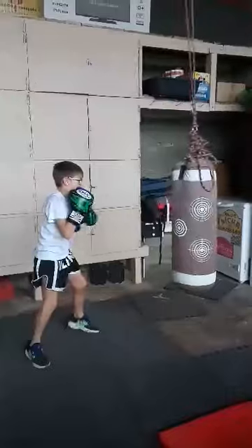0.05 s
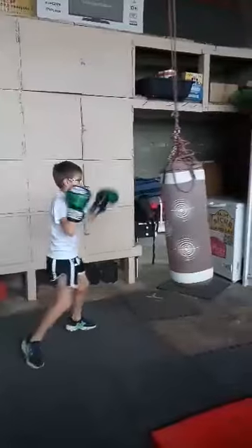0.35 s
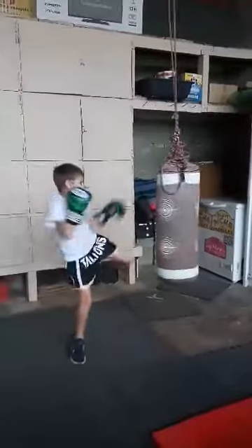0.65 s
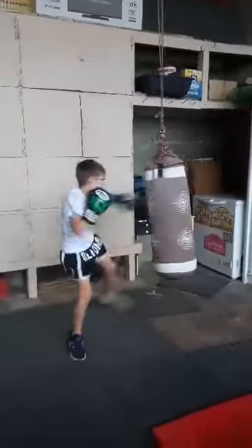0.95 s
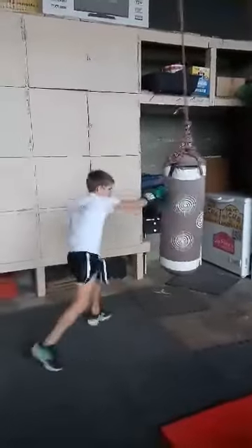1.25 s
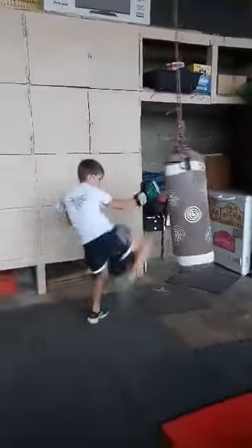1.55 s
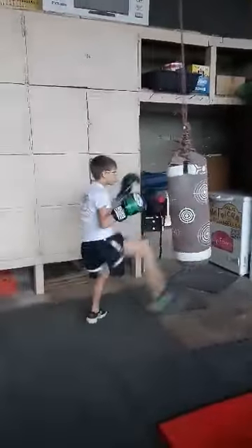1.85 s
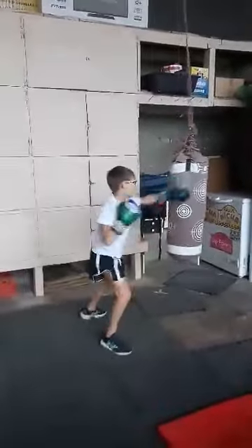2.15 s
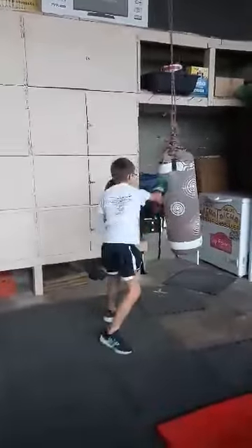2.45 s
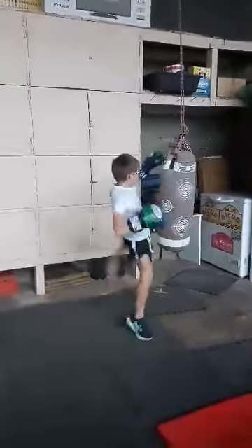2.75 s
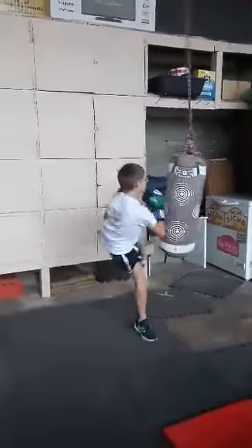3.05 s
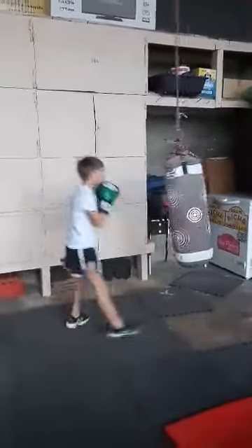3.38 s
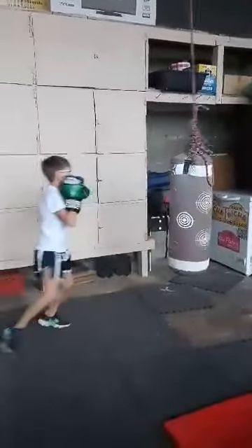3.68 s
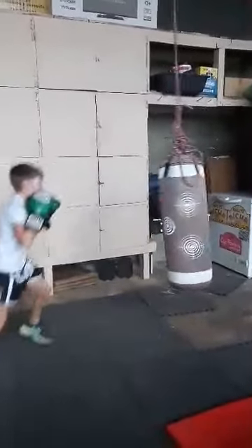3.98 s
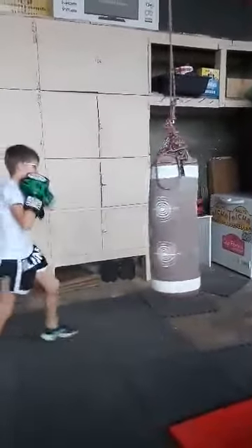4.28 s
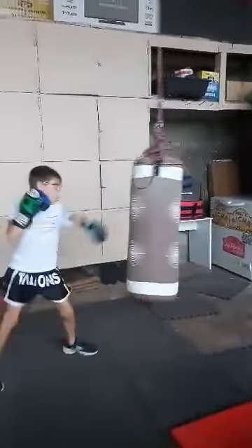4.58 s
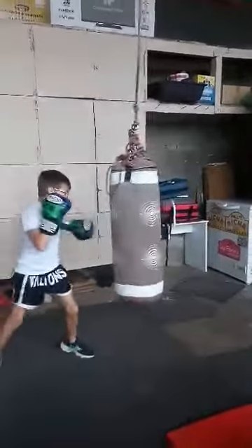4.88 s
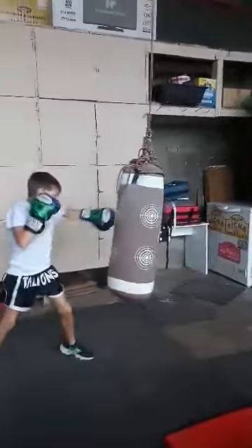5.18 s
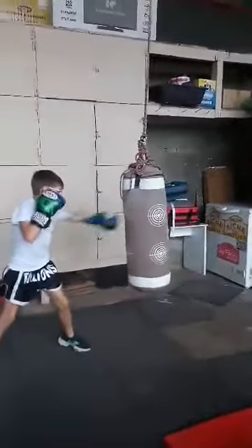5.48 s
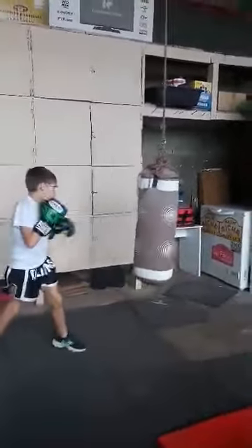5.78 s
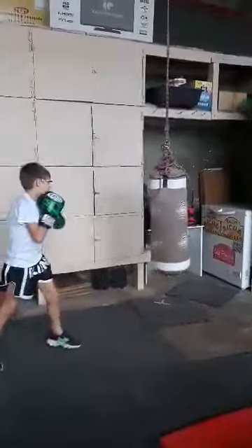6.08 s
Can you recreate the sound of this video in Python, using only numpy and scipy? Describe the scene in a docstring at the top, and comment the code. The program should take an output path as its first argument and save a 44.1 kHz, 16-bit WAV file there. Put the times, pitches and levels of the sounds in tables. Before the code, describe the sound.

In a garage, a quick run of blows hits a heavy bag, followed by footwork on mats, two lighter punches and a soft creak.

```python
"""Gloves and kicks on a hanging heavy bag in a garage; the room answers every sound.
A shuffle and a step lead into six blows (0.8-3 s): each a push of air, a boom of the filling and a
crackling slap of the cover. Clothes and soles swish; the hanger ticks and squeaks.
Footwork on rubber mats (3.3-4.5 s) leads into two lighter blows (4.8, 5.1 s).
The hanger creaks as the bag swings out (5.7-6 s), and a last soft step follows."""
import sys
import numpy as np
from scipy import signal
from scipy.fft import rfft, irfft
from scipy.io import wavfile
from scipy.ndimage import uniform_filter1d

SR = 44100
rng = np.random.default_rng(int(sys.argv[2]) if len(sys.argv) > 2 else 0)


def unload_audio(sound):
    """Save the sound as a 16-bit wav file, at the path given as the first command line argument."""
    columns = np.transpose(np.atleast_2d(sound))
    # keep every value between -1 and 1, then stretch to whole-number steps
    steps = np.round(np.clip(columns, -1, 1) * 32767)
    wavfile.write(sys.argv[1], SR, steps.astype(np.int16))


N = 274743
T = np.arange(int(.7 * SR)) / SR   # time axis of one event, s

# kicks and punches: t/s, force/dB, push f/Hz, boom/dB re force, boom f/Hz, slap/dB re force,
# crumple/dB re force, cover flattening/s, graze lead/s, swing-in/dB, slide-off/dB
BLOWS = [(0.8043, -33.5, 190.5, 12.5, 99, -6.5, -13.5, 0.0021, 0.0094, -84, -69),
         (1.0620, -41.5, 266, -13, 90, -5.5, -13.5, 0.0019, 0, -95, -59.5),
         (1.273, -39, 273, -14.5, 90, -7.5, -15, 0.0028, 0.015, -65, -63.5),
         (1.7074, -30, 165, -6.5, 66, -5, -17.5, 0.0026, 0.0061, -83, -62),
         (2.432, -36, 257, -20, 90, -11, -20, 0.0012, 0, -76, -65),
         (2.9506, -30, 262, 8, 85, -4.5, -13, 0.0034, 0.011, -69.5, -63),
         (4.7522, -41.5, 318, -3.5, 100, -5, -12.5, 0.0018, 0.024, -68, -67),
         (5.1190, -47, 288, -9, 100, -16, -11.5, 0.0075, 0, -90, -83)]
# steps: t/s, heel/dB, knock f/Hz, toe delay/s, toe/dB re heel, sole slap/dB re knock,
# heel grit/dB, toe grit/dB, sole flattening/s
STEPS = [(0.62, -64.5, 154, 0.015, -19, -5.5, -64.5, -72, 0.005),
         (1.984, -50.5, 330, 0.041, -1, -8, -58, -60.5, 0.0099),
         (2.088, -44.5, 307, 0.014, -9, -14.5, -64.5, -80, 0.0047),
         (2.658, -54.5, 205, .023, 6, -9, -67, -61, .002),
         (3.308, -44.5, 322, 0.053, -5.5, -2, -53, -64, 0.0059),
         (3.998, -51, 377, .055, -5, -1.5, -86, -61.5, 0.01),
         (4.387, -64, 442, 0.022, 3, -15, -76.5, -83, 0.0039),
         (4.487, -57.5, 214, 0.025, -2.5, -2, -83, -80, .006),
         (6.180, -68, 174, .015, -5, -12, -76, -72, 0.0041)]
# spectrum of cover crackle and floor grit: f/Hz, level/dB
CRACKLE = [(900, -25), (1800, -2.5), (2900, 3), (4300, -5), (6800, -5), (9500, -12.5), (13000, -22)]


def from_db(db):
    return 10 ** (np.asarray(db) / 20)


def at_hz(points, hz, column=1):
    """Table column interpolated over log frequency."""
    points = np.array(points, float)
    return np.interp(np.log(hz + 1e-3), np.log(points[:, 0]), points[:, column])


def noise(spectrum, samples, uneven_db=0):
    """Coloured noise, rms 1; uneven_db adds chance resonances a few hundred Hz wide."""
    hz = np.fft.rfftfreq(samples, 1 / SR)
    knots_hz = np.arange(0, SR / 2, 270)
    ripple = np.interp(hz, knots_hz, 2 * rng.random(len(knots_hz)) - 1)
    resonances_db = uneven_db * ripple * np.minimum(hz / 1500, 1)
    low_cut = np.minimum(hz / spectrum[0][0], 1) ** 2
    gain = from_db(at_hz(spectrum, hz) + resonances_db) * low_cut
    x = irfft(rfft(rng.standard_normal(samples)) * gain, samples)
    return x / np.std(x)


def gritty(spectrum, grain_db, uneven_db, grain_samples):
    """Noise in uneven grains, rms 1."""
    grain = uniform_filter1d(rng.standard_normal(len(T)), size=grain_samples)
    flicker = from_db(grain_db * np.clip(grain / np.std(grain), -2, 2))
    x = noise(spectrum, len(T), uneven_db) * flicker
    return x / np.std(x)


def burst(x, db):
    """Transient scaled to the energy of 25 ms at this level."""
    return from_db(db) * x / np.sqrt(np.sum(x ** 2) / (.025 * SR) + 1e-20)


def add(out, t_s, x):
    start = round(t_s * SR)
    lo, hi = max(start, 0), min(start + x.shape[-1], N)
    out[..., lo:hi] += x[..., lo - start:hi - start]


def left_right(mid, side, side_db=-1.5):
    return np.array([mid + from_db(side_db) * side, mid - from_db(side_db) * side])


def air():
    """Steady, low room noise."""
    spectrum = [(15, -48), (25, -10), (141, 2), (285, -5), (370, -3.5), (433, -6), (534, -8), (812, -11),
                (1170, -14.5), (1980, -16.5), (2250, -18), (3160, -20.5), (4220, -21), (13000, -38.5)]   # f/Hz, level/dB
    return from_db(-69) * left_right(noise(spectrum, N), noise(spectrum, N))


def garage(x):
    """Direct sound, floor and cupboard reflections, then a tail that differs with every position."""
    # early reflections: delay/s, gain
    echoes = [(.0050, 0.28), (0.011, 0.41), (0.031, .22)]
    # diffuse tail: f/Hz, t60/s, level/dB re direct
    decay = [(60, 0.67, -1), (129, 0.28, 5), (355, 0.41, 4.5), (910, 0.35, 0), (2160, 0.52, 3.5),
             (5530, 0.36, 0), (12000, 0.17, -4)]
    build_s = 0.0068
    onset = 1 - np.exp(-(T / build_s) ** 2)
    hz = np.fft.rfftfreq(len(T), 1 / SR)
    octaves_hz = 50 * 2. ** np.arange(9)
    white = rfft(rng.standard_normal((2, len(T))))
    tail = 0
    for centre_hz, share in zip(octaves_hz, np.eye(len(octaves_hz))):
        band = irfft(white * np.interp(np.log(hz + 1), np.log(octaves_hz), share), len(T))
        fade = from_db(-60 * T / at_hz(decay, centre_hz)) * onset
        tail = tail + band * fade / np.linalg.norm(fade) * from_db(at_hz(decay, centre_hz, column=2))
    response = left_right(*tail)
    response[:, 0] += 1
    for delay_s, gain in echoes:
        response[:, round(delay_s * rng.uniform(.92, 1.08) * SR)] += gain
    return signal.fftconvolve(x[None], response, axes=1)[:, :len(x)]


def stroke(half_s):
    """A slide speeds up and slows down around the middle of T."""
    return np.exp(-((T - T.mean()) / half_s) ** 2 / 2)


def squeak(hz, width_hz):
    """Friction noise in one narrow resonance, rms 1."""
    link = signal.iirpeak(hz, hz / (2 * width_hz), fs=SR)
    x = signal.lfilter(*link, signal.lfilter(*link, rng.standard_normal(len(T))))
    return x / np.std(x)


def hanger():
    """Slipping links excite one resonance each, purer the longer they slip; a creak excites several."""
    # link slips, ticks to squeaks: middle t/s, half length/s, f/Hz, level/dB
    slips = [(0.795, .0092, 9400, -69.5), (1.063, 0.0011, 9550, -51.5), (1.066, 0.0038, 2830, -51),
             (1.112, 0.012, 1090, -50), (1.281, 0.0073, 9700, -62), (1.692, 0.02, 9100, -70),
             (2.182, .022, 8740, -66.5), (2.24, 0.012, 5460, -66), (2.46, 0.0066, 8960, -68),
             (3.057, 0.00064, 6600, -44.5), (4.393, 0.0035, 6600, -73), (5.532, 0.0016, 5400, -68)]
    # creaks as the bag swings out: middle t/s, half length/s, level/dB
    creaks = [(5.692, .022, -68.5), (5.785, 0.024, -71), (5.972, .03, -82)]
    # hanger resonances: f/Hz, width/Hz, level/dB
    creak_modes = [(1066, 75, 1.5), (2650, 160, -7), (4720, 140, -10), (6280, 290, -6)]
    ref_width_hz, ref_half_s = 290, 0.0084
    out = np.zeros(N)
    for t_s, half_s, hz, db in slips:
        width_hz = ref_width_hz * np.sqrt(ref_half_s / half_s)
        add(out, t_s - T.mean(), from_db(db) * squeak(hz, width_hz) * stroke(half_s))
    for t_s, half_s, creak_db in creaks:
        creak = sum(from_db(db) * squeak(hz, width_hz) for hz, width_hz, db in creak_modes)
        add(out, t_s - T.mean(), from_db(creak_db) * creak * stroke(half_s))
    return garage(out)


def swishes():
    """Sliding friction catches in small grains: a broad rub under the sheen of smooth fabric."""
    # shuffles and turns: middle t/s, half length/s, rub/dB, sheen/dB re rub
    shuffles = [(0.489, 0.18, -79, -19), (1.473, .039, -77, -8), (2.275, 0.075, -63, -2),
                (2.362, 0.04, -61.5, -15), (2.56, 0.037, -70, -4), (3.256, 0.043, -63.5, -21),
                (3.52, .017, -70.5, -12), (3.645, 0.028, -66.5, -2), (5.58, 0.05, -76.5, -7.5),
                (5.731, .065, -72.5, -3)]
    # friction spectra: f/Hz, level/dB
    rub_spectrum = [(300, -4), (900, -4.5), (1600, 1.5), (2900, 7.5), (4300, 1.5), (6500, 3), (8500, -19),
                    (13000, -37)]
    sheen_spectrum = [(3000, -46), (6500, 2.5), (8200, -1), (9400, 2.5), (11000, -2.5), (13000, -13)]
    slides = []   # columns as in shuffles
    for t_s, *_, swing_db, slide_db in BLOWS:
        slides.append((t_s - 0.047, 0.024, swing_db, -9))   # clothes, as the limb swings in
        slides.append((t_s + .062, 0.037, slide_db, -2.5))   # glove or shin slides off
    for t_s, _, _, toe_s, *_, toe_grit_db, _ in STEPS:
        slides.append((t_s + toe_s + .015, .015, toe_grit_db - 3.5, -9.5))   # sole scuffs as the toe lands
    out = np.zeros(N)
    for t_s, half_s, rub_db, sheen_db in slides + list(shuffles):
        rub = gritty(rub_spectrum, grain_db=2.5, uneven_db=7, grain_samples=100)
        sheen = gritty(sheen_spectrum, grain_db=3.5, uneven_db=8, grain_samples=150)
        add(out, t_s - T.mean(), from_db(rub_db) * (rub + from_db(sheen_db) * sheen) * stroke(half_s))
    return garage(out)


def push(hz, decay_cycles):
    """Padded contact: the surface dents, rebounds and is still within a cycle or two."""
    cycles = hz * T
    return -np.sin(2 * np.pi * cycles) * np.sqrt(cycles) * np.exp(-cycles / decay_cycles)


def slap(spectrum, flatten_s, grain_db):
    """Two surfaces meet patch by patch: a quick, uneven spray of small cracks."""
    contact = (1 - np.exp(-T / (flatten_s / 2))) ** 2 * np.exp(-T / (2 * flatten_s))
    return gritty(spectrum, grain_db, uneven_db=7, grain_samples=40) * contact


def footwork():
    """Heel and toe each knock on the mat; the sole claps down over grit."""
    sole_spectrum = [(250, -10.5), (450, 9), (700, -5.5), (1100, 5.5), (1750, -4), (2500, -12.5),
                     (5000, -41), (12000, -62)]   # f/Hz, level/dB
    out, soles = np.zeros((2, N)), np.zeros(N)
    for t_s, heel_db, knock_hz, toe_s, toe_db, sole_db, heel_grit_db, toe_grit_db, flatten_s in STEPS:
        heel = (t_s, heel_db, heel_grit_db)
        toe = (t_s + toe_s, heel_db + toe_db, toe_grit_db)
        for touch_s, db, grit_db in (heel, toe):
            knock = burst(push(knock_hz, decay_cycles=0.31), db)
            grit = burst(slap(CRACKLE, flatten_s, grain_db=7), grit_db)
            add(out, touch_s, garage(knock + grit))
            add(soles, touch_s, burst(slap(sole_spectrum, flatten_s, grain_db=0.5), db + sole_db))
    return out + garage(soles)


def crumple(peak_s):
    """The cover buckles as the blow sinks in."""
    spectrum = [(500, -15), (1000, -0.5), (1500, 5), (2300, -4.5), (3100, -4), (4300, -8.5), (6500, -14),
                (12000, -34)]   # f/Hz, level/dB
    buckling = (T / peak_s) ** 3 * np.exp(-3 * T / peak_s)
    return gritty(spectrum, grain_db=5, uneven_db=7, grain_samples=60) * buckling


def bag_cover():
    """Each blow grazes, slaps, crackles and crumples the cover; patches sound from different sides."""
    slap_spectrum = [(250, -6.5), (450, -1.5), (660, -8), (950, 1), (1300, -8), (1900, -14), (2800, -12),
                     (5000, -59), (12000, -77)]   # f/Hz, level/dB
    patches, graze_re_slap_db, crackle_re_force_db = 3, -13.5, -19.5
    out = np.zeros((2, N))
    for _ in range(patches):
        patch = np.zeros(N)
        for t_s, force_db, _, _, _, slap_db, crumple_db, flatten_s, graze_s, *_ in BLOWS:
            for lead_s, db in ((graze_s, slap_db + graze_re_slap_db), (0, slap_db)):
                contact = slap(slap_spectrum, flatten_s + lead_s, grain_db=2.5)
                add(patch, t_s - lead_s, burst(contact, force_db + db))
            crackle = slap(CRACKLE, flatten_s * 2, grain_db=3)
            add(patch, t_s, burst(crackle, force_db + crackle_re_force_db))
            add(patch, t_s, burst(crumple(peak_s=0.025), force_db + crumple_db))
        out += garage(patch) / np.sqrt(patches)
    return out


def ring(modes, spread_db):
    """Damped modes, each struck with its own strength."""
    out = np.zeros(len(T))
    for hz, db, t60_s in modes:
        tone = np.sin(2 * np.pi * hz * T + rng.uniform(0, 2 * np.pi))
        out += tone * from_db(db + rng.normal(0, spread_db) - 60 * T / t60_s)
    attack_s = 0.0016
    return out * (1 - np.exp(-T / attack_s))


def bag_filling():
    """A glove or shin pushes the air; the heavy filling heaves once and rings."""
    # modes of the bag and the air round it, deep from a kick, hollow from any dent: f/Hz, level/dB, t60/s
    deep_modes = [(67.6, -15.5, 0.41), (85.5, -6, 0.22), (107.6, 5.5, 0.167), (161, -6.5, 0.32)]
    hollow_modes = [(205.8, -45, 0.21), (272.7, -12.5, 0.81), (362.6, -6, 0.55), (438, 11, 0.21),
                    (510, 0, 0.14)]
    deep_re_boom_db, hollow_re_force_db = -7.5, -6.5
    room_share = .42   # the boom's long wave arrives mostly direct
    out = np.zeros((2, N))
    for t_s, force_db, push_hz, boom_db, boom_hz, *_ in BLOWS:
        thud = burst(push(push_hz, decay_cycles=0.22), force_db)
        boom = burst(push(boom_hz, decay_cycles=0.57), force_db + boom_db)
        add(out, t_s, (1 - room_share) * boom + garage(thud + room_share * boom))
        add(out, t_s, burst(ring(deep_modes, spread_db=1.0), force_db + boom_db + deep_re_boom_db))
        add(out, t_s, burst(ring(hollow_modes, spread_db=3.5), force_db + hollow_re_force_db))
    return out


def scene():
    return air() + bag_filling() + bag_cover() + footwork() + swishes() + hanger()


def record(dry):
    """Only the treble is stereo; the level fades in; the port has a notch; deep bass and top are cut."""
    mono_below_hz, fade_s, notch_hz, low_cut_hz, high_cut_hz = 4400, 0.28, 8150, 50, 13100
    mid, side = (dry[0] + dry[1]) / 2, (dry[0] - dry[1]) / 2
    side = signal.sosfilt(signal.ellip(8, .5, 70, mono_below_hz, "high", fs=SR, output="sos"), side)
    fade_in = np.minimum(np.arange(N) / SR / fade_s, 1)
    x = np.array([mid + side, mid - side]) * fade_in
    x = x - 0.45 * signal.lfilter(*signal.iirpeak(notch_hz, Q=7, fs=SR), x)
    x = signal.sosfilt(signal.butter(7, low_cut_hz, "high", fs=SR, output="sos"), x)
    return signal.sosfilt(signal.ellip(12, .1, 80, high_cut_hz, fs=SR, output="sos"), x)


dry = scene()
out = record(dry)
unload_audio(out)
```